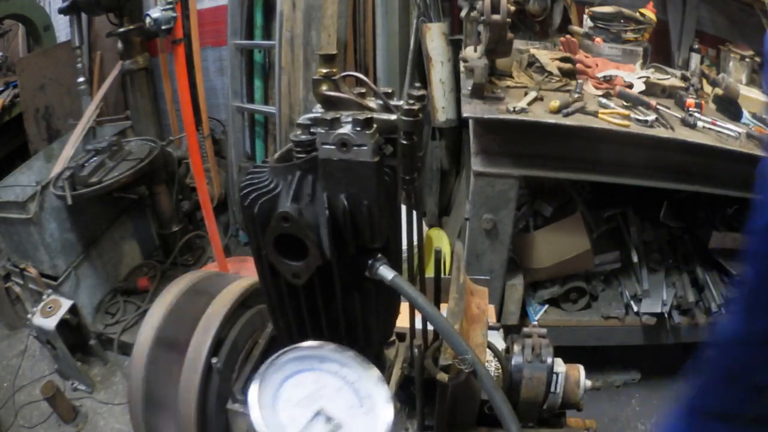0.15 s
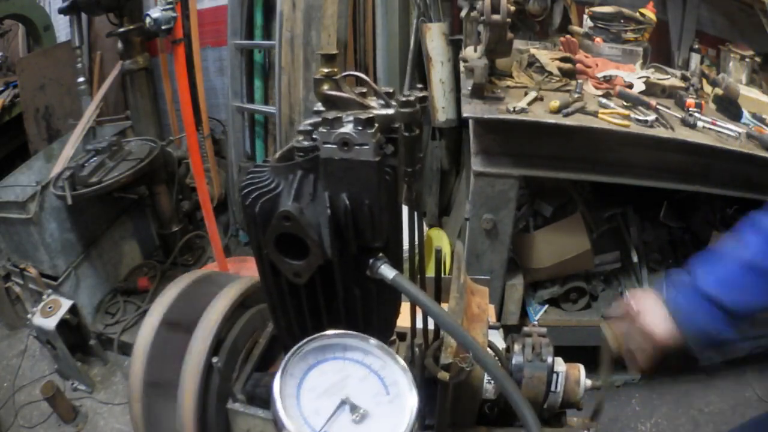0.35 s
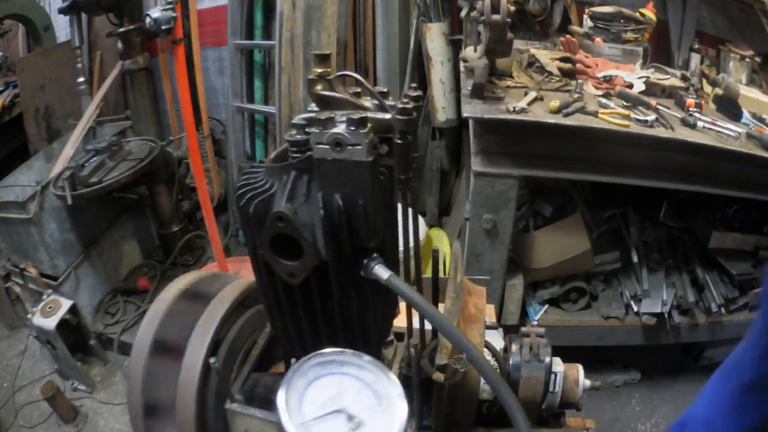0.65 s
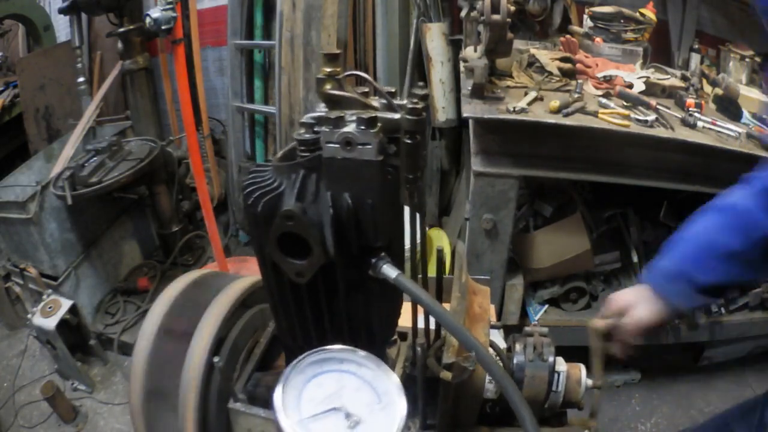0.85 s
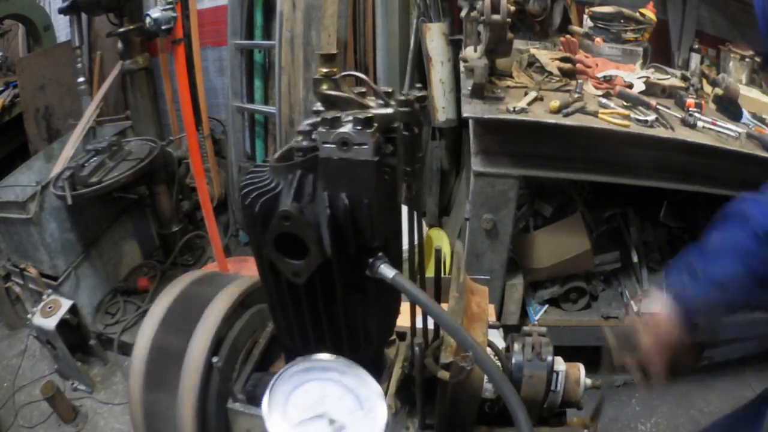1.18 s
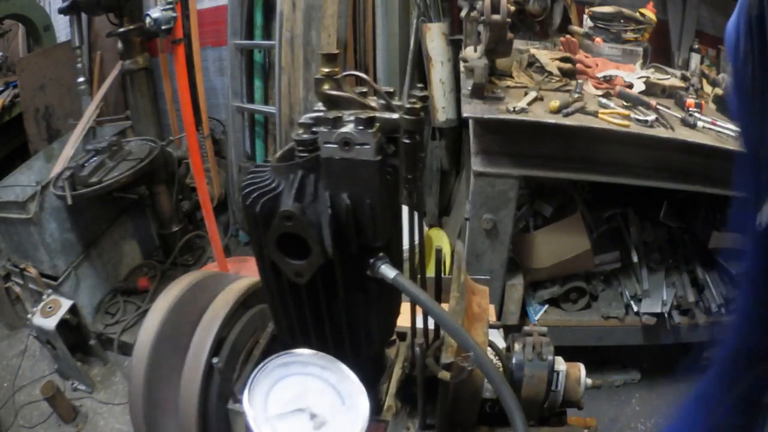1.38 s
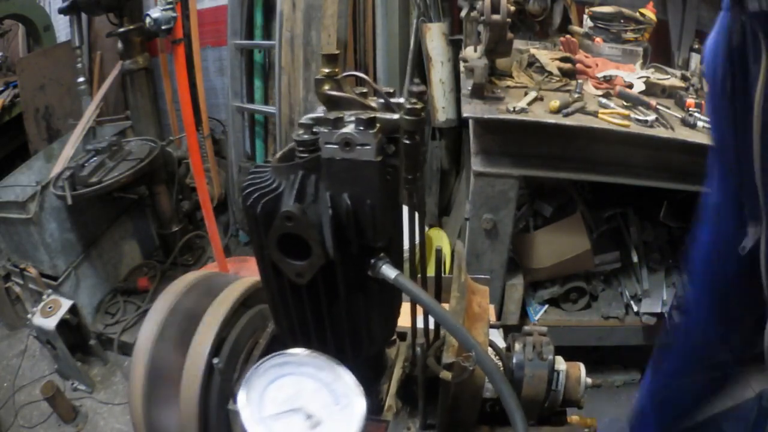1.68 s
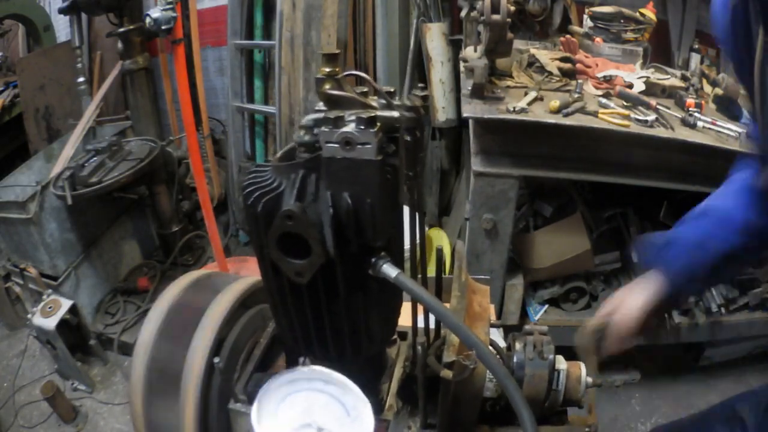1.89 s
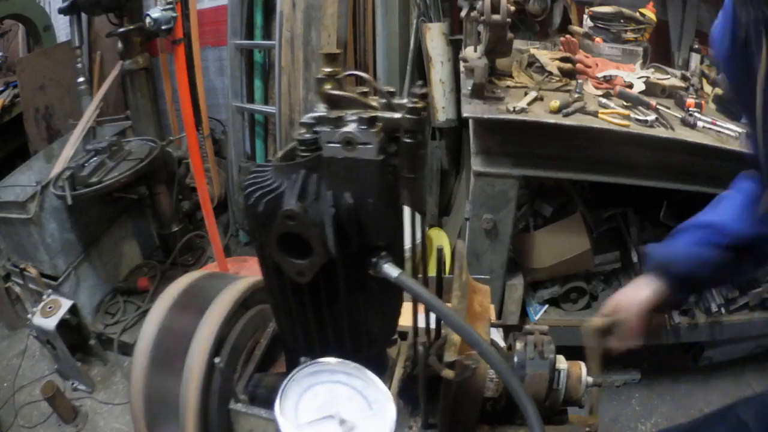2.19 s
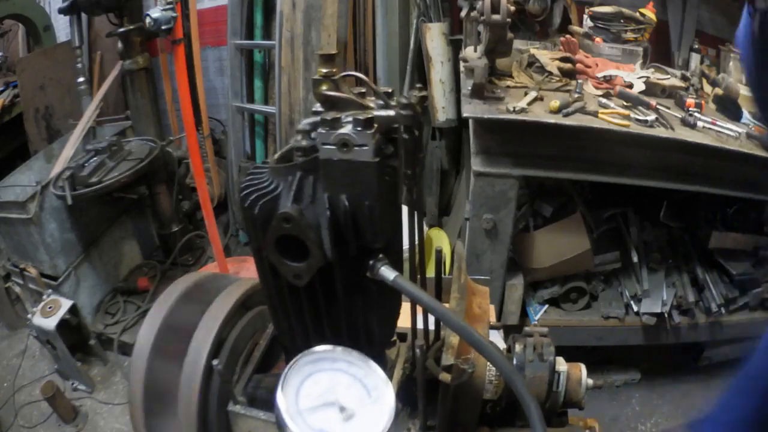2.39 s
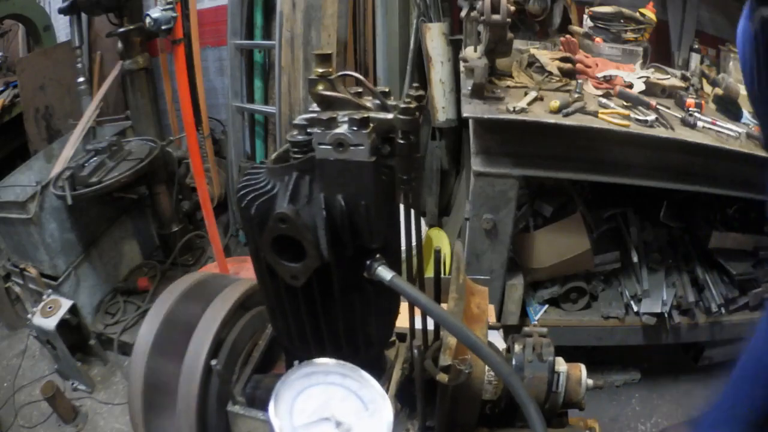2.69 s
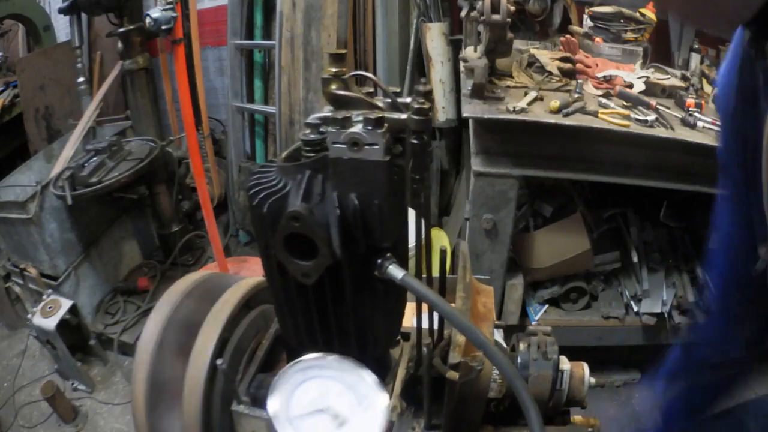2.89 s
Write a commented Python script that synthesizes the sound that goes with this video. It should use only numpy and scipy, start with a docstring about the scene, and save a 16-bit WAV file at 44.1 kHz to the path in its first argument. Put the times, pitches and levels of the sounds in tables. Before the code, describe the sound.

Rapid metallic clatter and sharp clicks from a hand-turned old engine, after one tiny squeak

```python
"""In a cluttered workshop, an old stationary engine is cranked by hand, and a dry joint squeaks first.
A catch snaps, the valve linkage clatters and ticks, and the iron block thuds: noisy blows ring each part.
Gears scrape through many tiny contacts, the squeak is a gliding tone with overtones, and the hiss is noise.
Clutter scatters the sound, the shop adds reflections, and two microphone ports pick it all up."""
import sys
import numpy as np
from scipy import signal
from scipy.fft import rfft, irfft, next_fast_len
from scipy.io import wavfile
from scipy.ndimage import uniform_filter1d

SR = 44100
rng = np.random.default_rng(int(sys.argv[2]) if len(sys.argv) > 2 else 0)


def int16_out(signal):
    """Quantize to a 16-bit WAV file."""
    q = np.round(np.clip(np.atleast_2d(signal).T, -1, 1) * 32767)
    wavfile.write(sys.argv[1], SR, q.astype(np.int16))


N = 134505

# Levels in the tables are relative: the functions below trim them.
# A shudder time is how long the small impacts take to fall by 60 dB.
# Catch snapping over: (time [s], level [dB], shudder time [s])
SNAPS = [(0.2224, -3, 0.039), (1.107, -3, 0.035), (1.7824, -5, 0.046), (2.3917, -6.5, 0.061),
         (2.9861, -5, 0.057)]
# Ringing tones of the catch: (pitch [Hz], width [Hz], level [dB])
CATCH_MODES = [(1160, 61, -5), (1330, 190, 0), (1870, 61, -17), (2450, 68, -8), (2850, 130, 7),
               (3340, 340, 7.5), (4230, 150, 5), (4440, 410, -3.5)]
# Broad knock of the catch and the tappet: (frequency [Hz], level [dB])
CATCH_KNOCK = [(100, -37), (300, -29), (800, -25), (1150, -5.5), (1900, -4), (3200, -0.5), (4200, -13.5),
               (4900, -29), (6200, -44.5), (8000, -43), (16000, -56)]
# Tappet closing: (time [s], level [dB], shudder time [s])
TAPS = [(0.7014, -12, 0.039), (1.4635, -10.5, 0.042), (2.0946, -12, 0.032), (2.6939, -10.5, 0.039)]
# Ringing tones of the tappet: (pitch [Hz], width [Hz], level [dB])
TAPPET_MODES = [(966, 62, 9.5), (1910, 54, 2), (2360, 75, 12), (3124, 210, 15.5), (4200, 150, -1)]
# Linkage clatter: (time [s], level [dB], shudder time [s], tilt [dB per octave],
# favoured frequency [Hz], rise time [ms])
CLATTER = [(0.1251, -15, 0.087, -1.5, 3050, 0.75), (0.1438, -13, 0.061, -1.8, 3860, 2),
           (0.2893, -26, 0.069, -12, 950, 1.9), (0.4, -14.5, 0.064, 2.5, 2240, 1.5),
           (0.4149, -21, 0.11, -2, 1440, 1.5), (0.4561, -6.5, 0.12, -0.5, 3770, 0.75),
           (0.496, -20.5, 0.13, -6, 3480, 1.3), (0.5743, -25.5, 0.15, -2.5, 2730, 0.84),
           (0.7828, -15.5, 0.049, -11, 1220, 0.97), (0.8009, -20.5, 0.041, -5, 1250, 1.3),
           (0.8524, -11.5, 0.092, -10, 1440, 0.61), (0.8874, -12.5, 0.057, -5, 1290, 0.74),
           (0.9465, -18, 0.1, 0, 1310, 1.8), (1.0282, -13.5, 0.041, 3.5, 3520, 1.6),
           (1.0443, -14, 0.12, 2.5, 1470, 0.95), (1.092, -20.5, 0.24, -6.5, 2800, 1.8),
           (1.2437, -12, 0.086, -1, 2990, 0.83), (1.2571, -16.5, 0.06, -4.5, 3350, 0.85),
           (1.2847, -7, 0.12, 1.5, 3330, 0.6), (1.2903, -10, 0.015, 0, 3070, 1.2),
           (1.3184, -14.5, 0.033, -5.2, 1290, 0.97), (1.5071, -22.5, 0.043, -14.5, 1270, 1.1),
           (1.5423, -20.5, 0.033, -7.5, 1390, 2.2), (1.5875, -19.5, 0.05, 6, 1200, 1.2),
           (1.611, -14, 0.11, 5, 1390, 0.74), (1.6834, -30.5, 0.061, -11.5, 1300, 1.5),
           (1.7181, -22, 0.028, -0.5, 3160, 1.2), (1.73, -20, 0.039, -5.5, 3700, 1.5),
           (1.9014, -13, 0.15, -0.6, 3340, 1.5), (1.9358, -10.5, 0.078, 0, 3550, 1.4),
           (1.9616, -21.5, 0.17, -6, 3520, 1.9), (1.9841, -23, 0.073, -17.5, 1280, 1),
           (2.0135, -21, 0.064, -2, 2500, 1.7), (2.0577, -29, 0.082, 3, 2800, 2.5),
           (2.122, -23.5, 0.18, -5.5, 1270, 0.93), (2.1582, -20.5, 0.053, 5, 1360, 1.3),
           (2.2081, -21.5, 0.29, -6.5, 3880, 3.5), (2.2286, -10.5, 0.017, 9, 3840, 0.7),
           (2.234, -10.5, 0.023, 3.5, 3500, 0.5), (2.2813, -19, 0.14, 8.5, 2900, 1.8),
           (2.3074, -27.5, 0.16, -6.5, 4000, 1.8), (2.333, -26, 0.069, -3.5, 3500, 1.5),
           (2.5061, -16.5, 0.071, 0.5, 3330, 1.2), (2.539, -9.5, 0.088, -1, 3350, 0.71),
           (2.565, -25.5, 0.15, -10, 3500, 1.2), (2.615, -32, 0.15, -3.5, 2700, 1.5),
           (2.645, -23.5, 0.037, 5.5, 2700, 4), (2.7216, -23.5, 0.16, -2, 1340, 1.7),
           (2.7356, -19, 0.056, 1.5, 3180, 1.4), (2.804, -26.5, 0.033, -1, 3200, 1.3),
           (2.821, -14.5, 0.073, 6.5, 4200, 4), (2.828, -12, 0.056, -6.5, 3510, 1.5),
           (2.9164, -17, 0.083, 2, 2800, 1.4), (2.938, -22.5, 0.039, -7.5, 1470, 1.5),
           (2.9706, -23.5, 0.16, 14, 2820, 1.5)]
# Ringing tones of the linkage: (pitch [Hz], width [Hz], level [dB]); body() widens those under 14 Hz
LINKAGE_MODES = [(1025, 11, -4), (1321, 21, 0.5), (1460, 42, 5.5), (1750, 23, 4), (2125, 51, 2),
                 (2450, 41, 3.5), (3000, 55, -12.5), (3075, 25, 1), (3456, 54, 11), (3630, 38, -15.5),
                 (4005, 41, 1), (4190, 250, 3)]
# Broad knock of the linkage: (frequency [Hz], level [dB])
LINKAGE_KNOCK = [(200, -39.5), (410, -11.5), (735, -11.5), (1270, -6), (1900, -4.5), (3430, -3.5),
                 (4500, -8.5), (5400, -19), (7500, -25.5), (10000, -50.5), (16000, -81.5)]
# Thuds in the block: (time [s], level [dB], shudder time [s], favoured frequency [Hz])
THUDS = [(0.223, -25.5, 0.091, 486), (0.286, -32, 0.026, 406), (0.403, -27.5, 0.042, 570),
         (0.466, -20, 0.033, 400), (0.783, -19, 0.049, 400), (0.802, -17, 0.022, 482),
         (0.845, -9, 0.066, 374), (0.884, -12.5, 0.034, 420), (0.903, -20.5, 0.15, 190),
         (0.947, -12.5, 0.043, 470), (0.989, -29, 0.036, 414), (1.26, -19, 0.045, 380),
         (1.325, -18.5, 0.059, 450), (1.505, -28, 0.045, 400), (1.544, -19.5, 0.037, 464),
         (1.596, -13.5, 0.036, 360), (1.619, -19.5, 0.031, 186), (1.686, -24.5, 0.045, 424),
         (1.72, -26.5, 0.019, 367), (1.934, -22.5, 0.029, 417), (1.98, -22, 0.042, 430),
         (2.057, -28.5, 0.058, 363), (2.122, -21.5, 0.049, 388), (2.166, -21, 0.018, 465),
         (2.217, -18, 0.03, 272), (2.266, -27, 0.038, 444), (2.307, -23, 0.066, 460),
         (2.388, -30, 0.022, 568), (2.541, -23.5, 0.086, 396), (2.663, -30, 0.034, 222),
         (2.726, -20.5, 0.073, 450), (2.763, -23.5, 0.05, 463), (2.81, -23, 0.092, 355),
         (2.834, -16.5, 0.018, 634), (2.857, -14, 0.023, 384), (2.915, -19, 0.041, 410),
         (2.983, -24, 0.028, 556)]
# Ringing tones of the block: (pitch [Hz], width [Hz], level [dB]); body() widens those under 14 Hz
BLOCK_MODES = [(190, 12.3, -1), (248, 7.8, -32), (292, 50, -3.5), (369.7, 59, -3), (406.3, 9.5, 3.5),
               (453, 24.4, 5), (490, 18, -7), (559.2, 11, 7.5), (870, 13, -10.5)]
# Broad knock of the block: (frequency [Hz], level [dB])
BLOCK_KNOCK = [(12, -83), (20, -43), (87, -37), (268, -8.5), (419, 10), (567, -11.5), (634, 0.5),
               (900, 12.5), (1170, -11.5), (1980, -120)]
# Thin bright ticks, and the short treble crack of the harder blows:
# (time [s], level [dB], level of the highest treble [dB])
TICKS = [(0.221, -2.5, -18), (0.462, -25, -20), (0.8725, -34, -28), (1.1064, -7, -21), (1.2897, -30, -28),
         (1.5884, -21, -25), (1.6372, -6, -9), (1.7861, -9, -51), (1.904, -14, -40), (2.0503, -33, -30),
         (2.157, -37, -37.5), (2.238, -6, -18.5), (2.396, -9, -47), (2.507, -25, -22), (2.6464, -36, -11),
         (2.736, -7.5, -31.5), (2.9855, -12, -26)]
# Tone colour of a tick or crack: (frequency [Hz], level [dB])
TICK_COLOUR = [(2000, -27.5), (3700, 16), (6400, -5), (8000, 1), (10000, -4)]
# Highest treble of a tick or crack: (frequency [Hz], level added to that of each one [dB])
TICK_TOP = [(11500, 12), (13000, 6), (14500, 8), (16200, -6.5)]
# Gears and bearings: (time [s], scrape level [dB], low rumble level [dB], hiss level [dB])
SCRAPE = [(0.0, -42, -44.5, -78), (0.079, -46, -59, -55), (0.21, -37.5, -47, -64), (0.35, -43, -57.5, -61),
          (0.54, -43, -55.5, -64), (0.78, -47.5, -47, -63), (0.83, -39.5, -70, -55),
          (0.92, -30, -55, -50.5), (0.97, -36, -35.5, -57.5), (1.1, -43, -46, -55), (1.31, -39, -53.5, -67),
          (1.52, -40.5, -43.5, -59), (1.77, -36, -47.5, -63.5), (1.9, -40, -52.5, -60.5),
          (2.01, -48, -66.5, -66), (2.13, -37, -38.5, -64), (2.22, -42.5, -41.5, -56),
          (2.37, -32, -52.5, -69), (2.5, -42.5, -49, -64), (2.61, -44, -51.5, -68),
          (2.74, -41.5, -48.5, -60), (2.93, -33, -43, -58.5), (3.05, -29, -43.5, -59)]
# Path of the squeak: (time [s], pitch [Hz], level [dB])
SQUEAK = [(0, 1900, -36.5), (.005, 2166, -12), (.012, 2385, -9.5), (0.019, 2620, -14), (0.029, 2582, -16),
          (0.035, 2569, -32), (.045, 2542, -19), (.05, 2570, -43), (.075, 2580, -47), (.1, 2580, -34),
          (.12, 2540, -38)]
# Overtones of the squeak: (multiple of its pitch, level [dB])
SQUEAK_TONES = [(1, -1.5), (2, -13.5), (3, -29.5), (4, -35)]
# Tone colour of the hiss: (frequency [Hz], level [dB])
HISS_COLOUR = [(3000, -48.5), (4500, -17.5), (5500, -13.5), (8000, -20), (10000, -24.5), (13000, -31),
               (15000, -35), (16300, -75.5)]
# Scattering by clutter: (frequency [Hz], share reaching each side by its own path)
SCATTER = [(60, 0.2), (200, 0.051), (700, 0.074), (1300, 0.39), (2400, 0.47), (4400, 0.93), (8000, 0.81),
           (15000, 1)]
# Dying away of the shop's reflections: (frequency [Hz], time to fall by 60 dB [s])
SHOP_DECAY = [(200, 0.27), (700, 0.4), (2000, 0.35), (5000, 0.3), (9000, 0.15), (12000, 0.11)]
# Phase difference between the ports, left ahead below about 5 kHz and mostly behind above:
# (frequency [Hz], left minus right [radians])
PORT_PHASE = [(0, .01), (1900, .2), (3100, .4), (4600, .3), (5300, -2.5), (6700, -5), (9000, -5),
              (11500, -3), (16000, .1)]
# Balance of the ports: (frequency [Hz], left minus right [dB])
PORT_BALANCE = [(60, -1), (150, -2), (380, -3.5), (950, -1.5), (2380, -1), (5980, -4), (15000, -1)]
# Response of the microphone: (frequency [Hz], level [dB])
MICROPHONE = [(20, 11), (70, 1.5), (110, -10.5), (160, -5), (220, 0), (16000, -1.3)]

# Typical random change of each ringing tone, in level and as a share of its pitch
MODE_SPREAD_DB, MODE_SHIFT = 3.5, .03
STEADY = .35  # share of those changes for tappet and block blows, whose tones vary less
CHATTER_HZ, CHATTER_DEPTH = 163, 0.14  # the squeak's grip
CONTACTS, CONTACT_S = 8, .045  # places where the gears rub, and the length of each turn at rubbing
HISS_GRAIN_DB, HISS_FLICKER_DB = -0.5, 1.5
TICK_SCATTER_S = .0015  # ticks and treble cracks scatter little
EDGE_HZ = 16450  # upper band limit


def amp(db):
    """Turn decibels into a plain multiplier."""
    return 10 ** (np.asarray(db) / 20)


def evened(x):
    """Scale to an average strength (RMS) of one."""
    return x / np.sqrt(np.mean(x ** 2) + 1e-20)


def read(points, hz):
    """Read a frequency table between its points, on a logarithmic frequency scale."""
    f, value = np.transpose(points)
    return np.interp(np.log(hz + 1), np.log(f + 1), value)


def add(mix, s, sound):
    """Mix in a sound starting at s seconds."""
    part = mix[max(round(s * SR), 0):][:len(sound)]
    part += sound[:len(part)]


def colour(points, size=8192):
    """Make a filter with the given spectrum that responds only after it is struck."""
    level_db = np.maximum(read(points, abs(np.fft.fftfreq(size, 1 / SR))), -110)
    # The Hilbert transform gives the phase that puts the energy as early as possible.
    log_spectrum = np.conj(signal.hilbert(np.log(amp(level_db))))
    return np.fft.ifft(np.exp(log_spectrum)).real[:size // 2]


def body(modes, knock, knock_db, tilt_db=0, near_hz=2200, focus_db=0, low_hz=880, loose=1):
    """A part rings in fading tones over a broad knock; a blow favours tones near where it lands."""
    def favour(f):
        tilt = tilt_db * np.log2(np.clip(f, 500, 6000) / 2200)
        return tilt + focus_db * np.exp(-(np.log2(f / near_hz) / 0.24) ** 2)

    t = np.arange(4096) / SR
    hz, width, db = np.transpose(modes)[:, :, None]
    db = db + favour(hz) + loose * MODE_SPREAD_DB * rng.standard_normal(hz.shape)
    hz = hz * (1 + loose * MODE_SHIFT * rng.standard_normal(hz.shape))
    width = np.maximum(width, 14)
    # A wider tone fades faster.
    strength = amp(db) * width * 2 * np.pi / SR
    rings = (strength * np.exp(-np.pi * width * t) * np.sin(2 * np.pi * hz * t)).sum(0)
    band = signal.butter(3, [low_hz, 5200], 'band', fs=SR, output='sos')
    broad = colour([(f, d + favour(f)) for f, d in knock])
    return signal.sosfilt(band, rings) + amp(knock_db) * broad


def blow(level_db, t60, ring, rise_s, lumpy_db, firm=4.8):
    """A firm strike, then a shudder of small uneven impacts dying away, rings the part."""
    t = np.arange(6000) / SR
    lumps = evened(uniform_filter1d(rng.standard_normal(6000), 40))
    jolts = rng.standard_normal(6000) * amp(lumpy_db * lumps)
    jolts[round(rise_s * SR)] += firm
    shape = (1 - np.exp(-t / rise_s)) * amp(-60 * t / t60)
    sound = signal.fftconvolve(jolts * shape, ring)
    # The loudest 3 ms sets the level.
    loudest = np.sqrt(uniform_filter1d(sound ** 2, size=130).max())
    return amp(level_db - 6.0) * sound / loudest


def catch_snaps(mix):
    """The catch snaps over with a sharp blow that rings it."""
    for s, db, t60 in SNAPS:
        ring = body(CATCH_MODES, CATCH_KNOCK, 2.2)
        add(mix, s - .0008, blow(db, t60, ring, 0.00027, 2.2))


def tappet_taps(mix):
    """The tappet closes with a sharp blow, and its tones vary little."""
    for s, db, t60 in TAPS:
        ring = body(TAPPET_MODES, CATCH_KNOCK, 1.5, loose=STEADY)
        add(mix, s - .0008, blow(db, t60, ring, 0.00023, 2.6))


def linkage_clatter(places):
    """Loose linkage parts knock at random places, each blow favouring its own pitch range."""
    for s, db, t60, tilt_db, near_hz, rise_ms in CLATTER:
        ring = body(LINKAGE_MODES, LINKAGE_KNOCK, 5.3, tilt_db, near_hz, focus_db=7.6)
        add(places[rng.integers(4)], s - .0008, blow(db, t60, ring, rise_ms / 1000, 3.46))


def block_thuds(mix):
    """Softer-edged blows ring the low tones of the iron block."""
    for s, db, t60, near_hz in THUDS:
        ring = body(BLOCK_MODES, BLOCK_KNOCK, -13.5, 0, near_hz, 13.0, low_hz=140, loose=STEADY)
        add(mix, s - .002, blow(db, t60, ring, 0.005485, 0.86, firm=6.4))


def ticks_and_cracks():
    """Very short blows through a bright filter make thin ticks and the treble crack of harder blows."""
    out = np.zeros(N)
    for s, db, top_db in TICKS:
        ring = colour(TICK_COLOUR + [(f, d + top_db) for f, d in TICK_TOP])
        add(out, s, blow(db - 8.0, 0.004, ring, 0.000067, 0.25))
    return out


def mechanism():
    """The heavier struck parts sound from four places on the engine."""
    places = np.zeros((4, N))
    catch_snaps(places[0])
    tappet_taps(places[1])
    linkage_clatter(places)
    block_thuds(places[2])
    return places


def gears():
    """Many tiny contacts ring the linkage and the block; the rubbing wanders from place to place."""
    s, high_db, low_db = np.transpose(SCRAPE)[:3]
    t = np.arange(N) / SR
    struck = rng.random((2, N)) < 1500 / SR  # about 1500 contacts a second
    force = amp(3.0 * np.minimum(rng.exponential(1, (2, N)), 5))
    grit = force * struck * rng.standard_normal((2, N))
    turns = rng.integers(0, CONTACTS, int(t[-1] / CONTACT_S) + 1)
    place = turns[(t / CONTACT_S).astype(int)]
    high, low = np.zeros((2, N))
    for k, near_hz in enumerate(np.geomspace(1000, 4300, CONTACTS)):
        here = grit * (place == k)
        ring = body(LINKAGE_MODES, LINKAGE_KNOCK, 1.0, 0, near_hz, focus_db=3.5)
        high += signal.oaconvolve(here[0], ring / np.linalg.norm(ring))[:N]
        low += signal.oaconvolve(here[1], body(BLOCK_MODES, BLOCK_KNOCK, -15.0, low_hz=115))[:N]
    scrape = amp(np.interp(t, s, high_db)) * evened(high)
    rumble = amp(np.interp(t, s, low_db) + 2.5) * evened(low)
    return scrape + rumble


def squeak():
    """A dry joint sticks and slips: a tone with overtones, chattering grip and trembling pitch."""
    s, hz, db = np.transpose(SQUEAK)
    t = np.arange(N) / SR
    tremble, waver = uniform_filter1d(uniform_filter1d(rng.standard_normal((2, N)), 70), 60)
    pitch = np.interp(t, s, hz) * (1 + 0.005 * evened(tremble))
    cycles = np.cumsum(pitch) / SR
    level = amp(np.interp(t, s, db, right=-120) + 2.9 * evened(waver))
    grip = level * (1 + CHATTER_DEPTH * np.cos(2 * np.pi * CHATTER_HZ * t))
    tones = sum(amp(d) * np.sin(2 * np.pi * k * cycles) for k, d in SQUEAK_TONES)
    return np.sqrt(2) * grip * tones


def hiss():
    """Grainy, flickering noise swells with the turning, and differs on each side."""
    s, level_db = np.transpose(SCRAPE)[[0, 3]]
    struck = rng.random(N) < 6000 / SR  # about 6000 grains a second
    grains = amp(HISS_GRAIN_DB * np.minimum(rng.exponential(1, N), 5)) * struck
    flicker = amp(HISS_FLICKER_DB * evened(uniform_filter1d(rng.standard_normal(N), 300)))
    noise = rng.standard_normal((2, N)) * (0.2 + grains) * flicker
    air = signal.oaconvolve(noise, colour(HISS_COLOUR)[None], axes=1)[:, :N]
    return amp(np.interp(np.arange(N) / SR, s, level_db) + 2.5) * evened(air)


def bench(x, scatter_s=0.01):
    """Nearby clutter scatters the sound, mostly the treble, along other paths to each side."""
    size = next_fast_len(N + 2048)
    share = np.clip(read(SCATTER, np.fft.rfftfreq(size, 1 / SR)), 0, 1)
    echoes = rng.standard_normal((2, 800)) * amp(-60 * np.arange(800) / SR / scatter_s)
    echoes /= np.linalg.norm(echoes, axis=1)[:, None]
    paths = np.sqrt(1 - share ** 2) + share * rfft(echoes, size)
    # Level out most of the peaks and dips of the paths.
    return irfft(rfft(x, size) * paths / abs(paths) ** .85, size)[:, :N]


def shop(x):
    """Sparse reflections, each band dying at its own speed, partly different for each ear."""
    echoes = np.zeros((2, SR // 2))
    # One reflection at a random spot in every 20 samples
    jitter = rng.integers(0, 20, (2, (SR // 2 - 201) // 20))
    at = np.arange(200, SR // 2 - 20, 20)[None] + jitter
    np.put_along_axis(echoes, at, rng.choice([-1., 1.], at.shape), 1)
    echoes[1] = 0.5 * echoes[0] + 0.56 * echoes[1]
    hz, t, bands = signal.stft(echoes, SR, nperseg=256)
    fade = amp(-60 * t / read(SHOP_DECAY, hz)[:, None])
    tail = signal.istft(bands * fade, SR, nperseg=256)[1]
    return signal.fftconvolve(x[None], tail / np.linalg.norm(tail[0]), axes=1)[:, :N]


def scene():
    """Add up the engine's places, ticks and cracks, their reflections and the hiss."""
    places = [*mechanism(), squeak() + gears()]
    bright = ticks_and_cracks()
    near = sum(bench(x) for x in places) + bench(bright, TICK_SCATTER_S)
    return near + amp(-14.5) * shop(sum(places) + bright) + hiss()


def record(dry):
    """Two microphone ports a little apart shape the bass, then the band limit removes the top."""
    size = next_fast_len(N + 2048)
    hz = np.fft.rfftfreq(size, 1 / SR)
    # Each port takes half of the level and phase difference.
    half = amp(read(PORT_BALANCE, hz) / 2) * np.exp(.5j * read(PORT_PHASE, hz))
    ports = irfft(rfft(dry, size) * np.array([half, 1 / half]), size)[:, :N]
    ports = signal.oaconvolve(ports, colour(MICROPHONE)[None])[:, :N]
    limit = signal.firwin(511, EDGE_HZ, window=("kaiser", 9), fs=SR)
    return signal.oaconvolve(ports, limit[None], "same")


dry = scene()
out = record(dry)
int16_out(out)
```